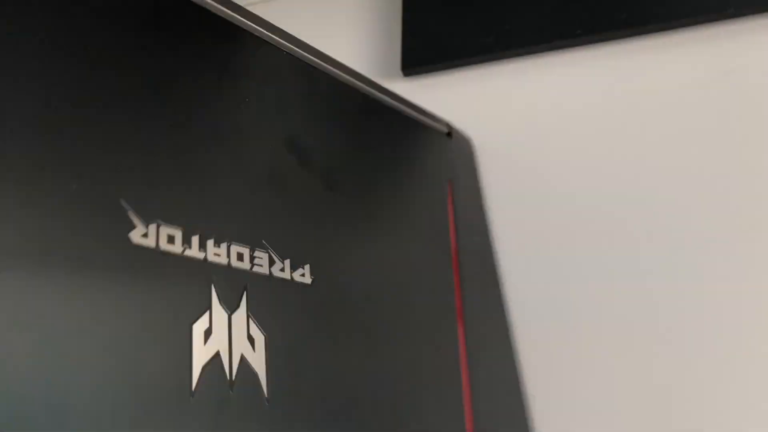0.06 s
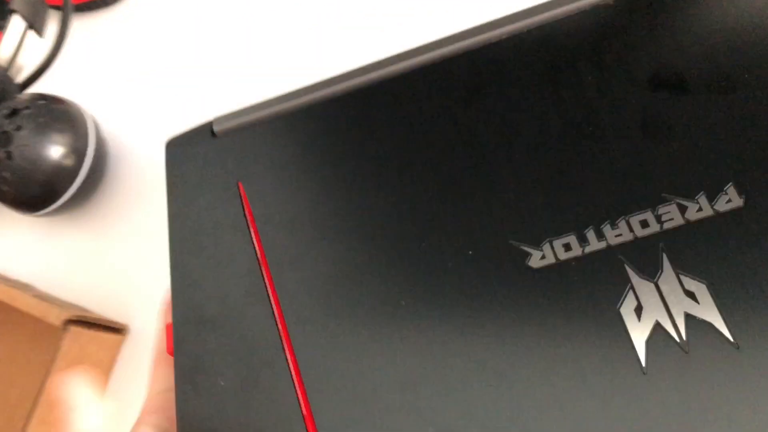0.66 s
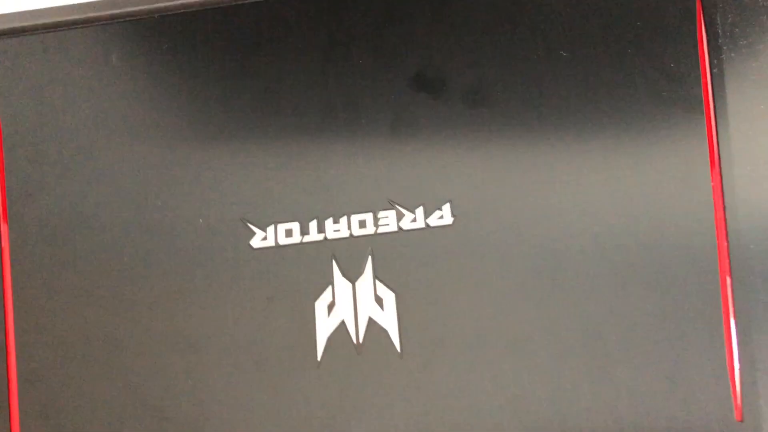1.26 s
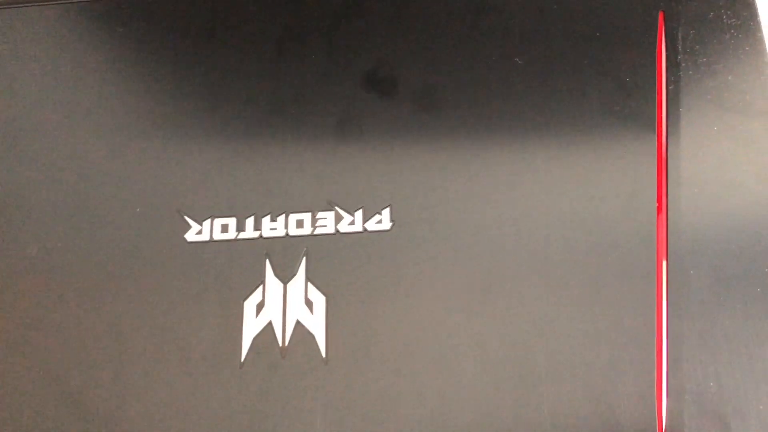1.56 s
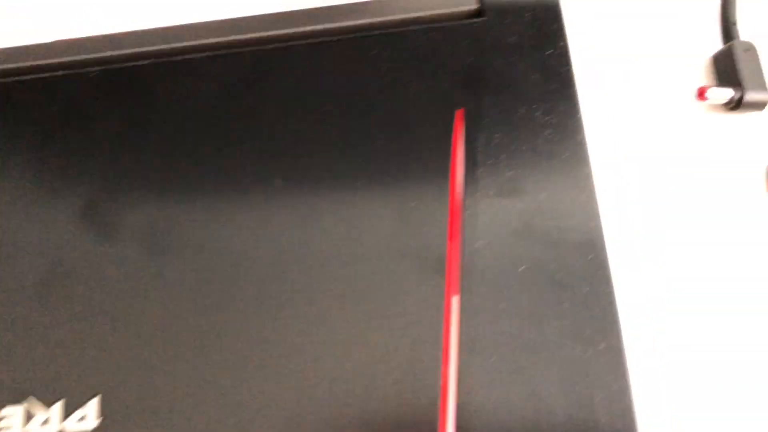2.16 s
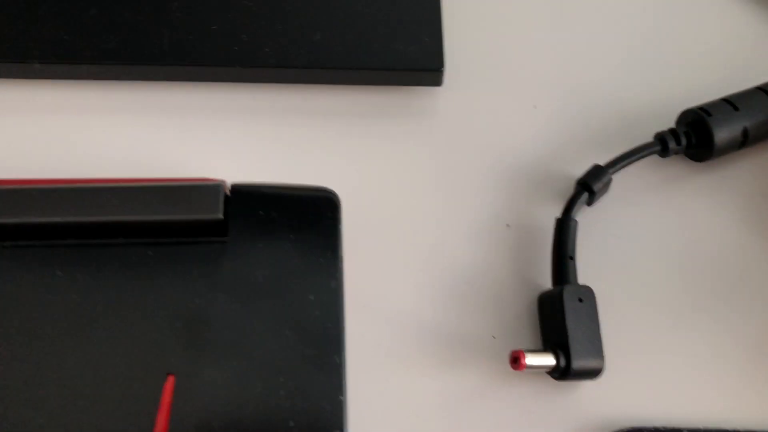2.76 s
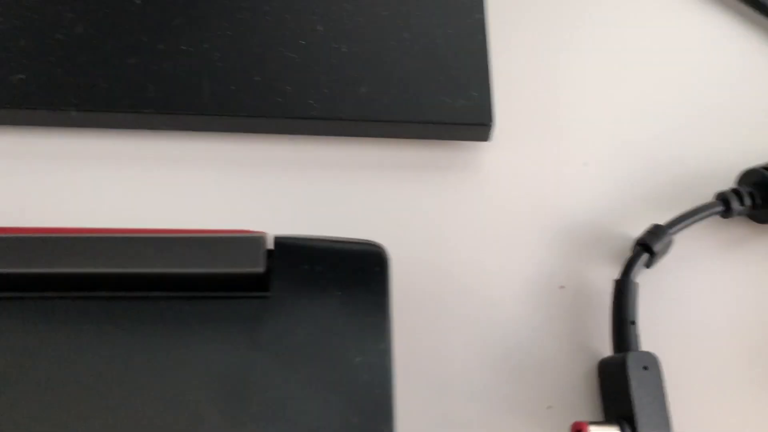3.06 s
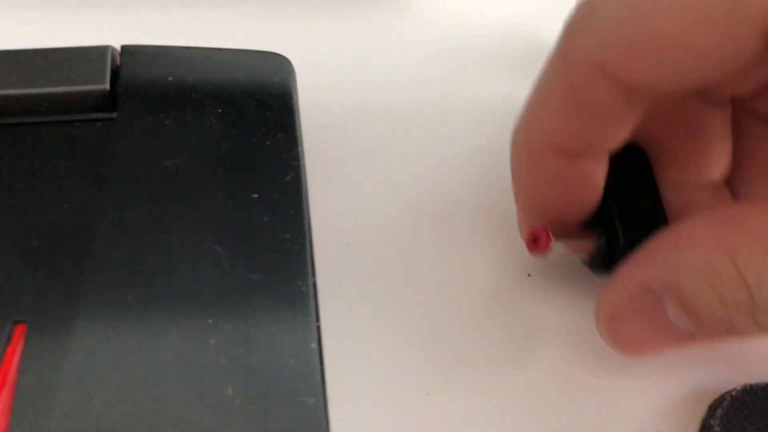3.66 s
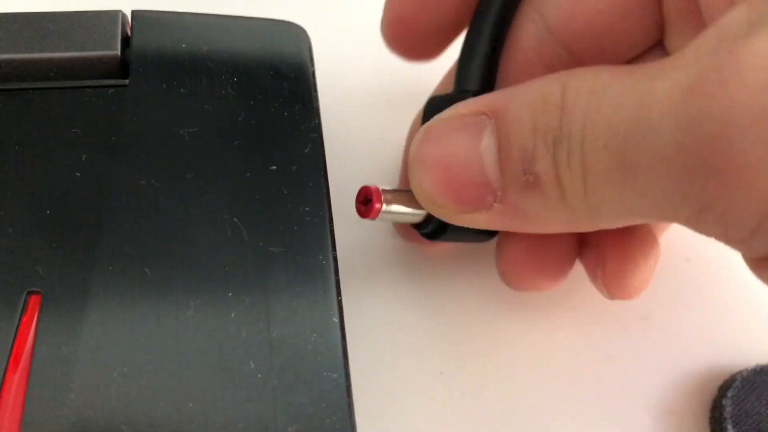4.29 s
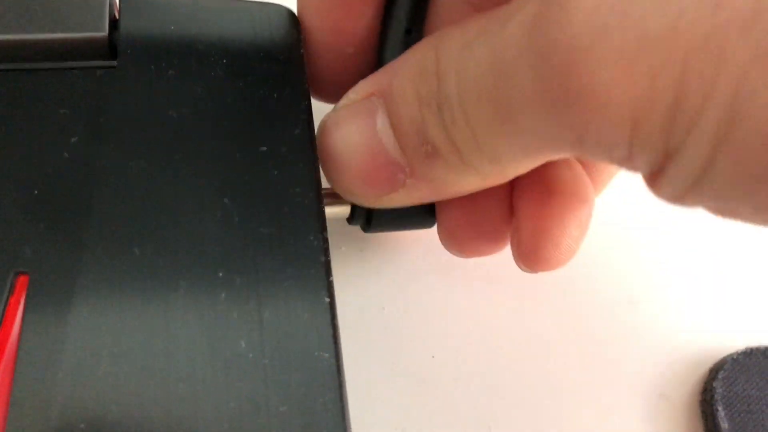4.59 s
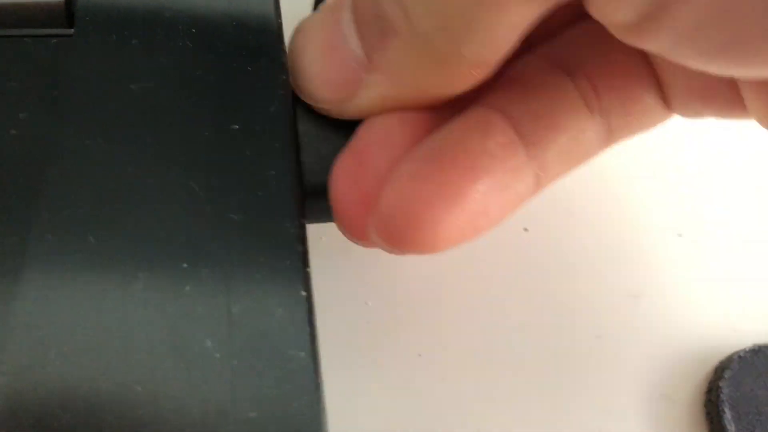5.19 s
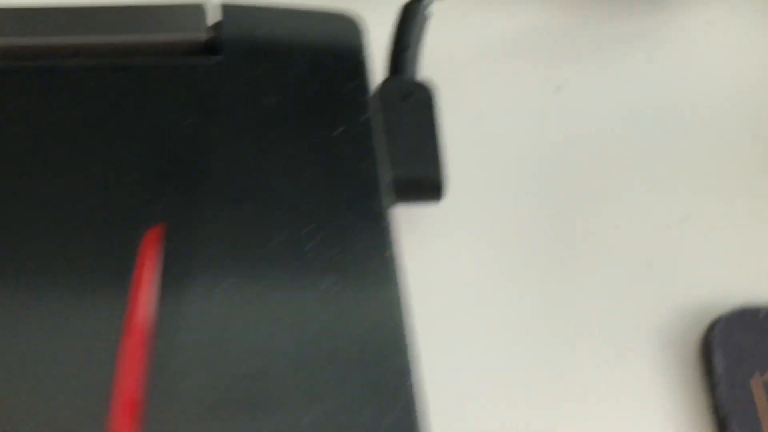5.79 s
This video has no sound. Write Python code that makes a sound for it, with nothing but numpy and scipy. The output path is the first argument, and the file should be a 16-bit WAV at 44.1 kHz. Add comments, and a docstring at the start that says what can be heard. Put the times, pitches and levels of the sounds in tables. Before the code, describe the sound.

A closed plastic laptop is slid round on a desk and set down with a quick run of hollow knocks, scrapes and tiny rubber squeaks. Fingers swish faintly over the lid, and one more knock follows. After a lull, a hand sweeps up a power plug, whose metal tip taps and scrapes along the case before snapping into the socket. It is all heard from close by in a small, quiet room.

```python
"""A closed plastic laptop is slid round on a desk and let down, knocking on its corners and rubber feet.
Each knock makes laptop and desk ring, and the rubber squeaks as it catches. Fingers swish over the lid,
and a thin hiss passes twice. From about 3.4 s a hand sweeps up the power plug. Its metal tip taps and
scrapes along the case and finds the socket, whose spring snaps round it at 5.2 s. A few faint touches
follow. All of it is heard from close by in a small, quiet room."""
import sys
import numpy as np
from scipy import signal
from scipy.fft import rfft, irfft, next_fast_len
from scipy.io import wavfile
from scipy.ndimage import uniform_filter1d

SR = 44100
rng = np.random.default_rng(int(sys.argv[2]) if len(sys.argv) > 2 else 0)


def output_pcm(signal):
    """Save a mono or channel-first signal as 16-bit PCM at the path in sys.argv[1].

    Samples are clipped to [-1, 1] before scaling.
    """
    pcm = np.clip(np.atleast_2d(signal).T, -1, 1) * 32767
    wavfile.write(sys.argv[1], SR, np.round(pcm).astype(np.int16))


N = 257544
TIME = np.arange(N) / SR

# The laptop hits the desk: (time [s], level [dB], extra thump [dB], treble fades above [Hz],
# distance through the desk [factor], ring time [factor], pitch the struck spot favours [Hz])
KNOCKS = [(0.003, -52.5, 9.3, 10200.0, 0.82, 0.93, 80.0), (0.2892, -30.5, -0.0, 6500.0, 1.03, 0.62, 136.5),
          (0.456, -40, -2.5, 5200.0, 0.99, 0.65, 952.0), (0.549, -31.5, 4.5, 5200.0, 1.43, 1.0, 797.0),
          (0.709, -37.5, -1.2, 10200.0, 0.75, 0.93, 328.0), (0.8366, -36.5, 1.5, 2900.0, 0.82, 0.9, 327.4),
          (0.8735, -33.5, -8.5, 5200.0, 1.2, 0.96, 152.3), (0.9197, -27.5, 4.5, 4600.0, 1.0, 1.0, 152.6),
          (1.0073, -18.5, -5, 5200.0, 0.56, 0.93, 500.0), (1.076, -33, -5.5, 2600.0, 1.2, 0.54, 950.0),
          (1.7447, -21.5, -7, 2300.0, 0.99, 0.73, 226.0)]
# Fingers and plug tap desk, case and socket: (time [s], level [dB], extra thump [dB],
# treble fades above [Hz], scrape length [factor], pitch the struck spot favours [Hz])
TAPS = [(2.0584, -59.5, -0.5, 11400.0, 0.82, 328.0), (2.5214, -48.5, -16.1, 599, 1.9, 440.0),
        (2.7162, -60, 2, 6500.0, 0.8, 440.0), (3.497, -49, 0.9, 4600.0, 0.97, 780.0),
        (3.5405, -54, 17.5, 10200.0, 2.3, 440.0), (4.1492, -40, -10.3, 598, 0.79, 950.0),
        (4.278, -28, -16, 600.0, 1, 1460.0), (4.32, -58.5, 10.5, 5200.0, 0.7, 1960.0),
        (4.3376, -50, -6, 3700.0, 1, 2750.0), (4.394, -48.3, -11, 1200.0, 2.3, 229.0),
        (4.4887, -57.5, -18.1, 16000.0, 0.8, 440.0), (4.4942, -64, -4.6, 16000.0, 0.86, 440.0),
        (4.5824, -48.7, 5, 6500.0, 1.4, 1130.0), (4.6809, -51.5, -5, 16000.0, 1.1, 229.0),
        (4.695, -46, -10.1, 2100.0, 1.6, 950.0), (4.705, -49.5, -9.5, 10200.0, 2.6, 2750.0),
        (4.7549, -56, -3, 5200.0, 0.8, 182.0), (4.8587, -37.5, -10, 700.0, 0.99, 1130.0),
        (4.888, -39, -11, 2590, 0.99, 436), (4.9316, -57.8, -7.8, 4600.0, 0.74, 440.0),
        (4.9823, -45.0, -16, 1700.0, 1.1, 440.0), (4.994, -63.5, 10.8, 8100.0, 0.8, 1130.0),
        (5.043, -42.1, -11.2, 1200.0, 0.9, 440.0), (5.1737, -34, -38.7, 4100.0, 1.2, 229.0),
        (5.181, -45, 3.3, 6500.0, 3.5, 437), (5.2077, -43.5, 2.6, 8100.0, 0.73, 2750.0),
        (5.214, -45.5, -6, 16000.0, 0.72, 182.0), (5.503, -59.5, -2, 2610, 2.0, 2750.0),
        (5.5874, -65.6, 11.5, 16020, 1.8, 2750.0), (5.6811, -64.5, -16, 9070, 2.1, 328.0)]
# The notes at which laptop and desk ring together: (pitch [Hz], level [dB], time to fade by 60 dB [s])
RING_NOTES = [(67, -11, 0.46), (131, -7, 0.19), (153, 0, .3), (182, -3, .2), (228, -4, .25),
              (278, -4, 0.11), (327.5, 0.5, .2), (436, -1, .07), (500, 3.5, 0.047), (779, 0, 0.073),
              (940, -2, .04), (1140, -2, 0.034), (1460, -1.5, 0.036), (1960, -2, .035), (2750, -1, .035)]
# Borders of the frequency bands in which a hit's level is set: (frequency [Hz])
KNOCK_BANDS = [40, 115, 260, 650, 1800, 4500, 9000, 16000]
TAP_BANDS = KNOCK_BANDS[1:]

# Rubbing strokes: (start [s], length [s], level [dB], pressure [dB])
SLIDES = [(-.03, .31, -46, 0.5), (.34, .2, -42, -7), (.57, .11, -42, 5), (.71, .11, -52, -7),
          (.87, .15, -44, 8)]  # laptop on the desk
SWISHES = [(1.335, 0.044, -58.5, 11.5), (1.38, 0.047, -55.5, 4), (1.45, 0.092, -60.5, 0),
           (1.545, 0.034, -54, -8), (1.59, 0.18, -54.5, 0.5), (2.06, 0.026, -60, 8),
           (2.125, .055, -67.5, -16)]  # fingers on the lid
BRUSHES = [(3.39, 0.11, -60, 0.5), (3.5, .17, -49, 1.5), (3.68, 0.2, -57, -1), (3.95, 0.061, -71, -7),
           (4.5, 0.14, -62, 9), (4.66, 0.17, -60.5, 8), (5.535, 0.039, -59.5, 1),
           (5.755, 0.057, -62.5, -6.5)]  # hand and plug on desk and case
# Rubber and skin catch and judder: (time [s], length [s], pitch [Hz], level [dB])
SQUEAKS = [(.586, 0.025, 830, -29), (.621, .024, 835, -32), (.657, .03, 900, -46), (3.815, 0.044, 900, -47)]
# The case's edge and the plug's barrel scratch: (time of peak [s], spread [s], level [dB])
SCRATCHES = [(.411, .006, -39), (3.637, .006, -45), (4.564, 0.0026, -44), (4.709, 0.0046, -48),
             (5.178, .0065, -41.5)]
# A thin hiss comes and goes: (time [s], level [dB])
THIN_HISSES = [(2.925, -61.5), (3.383, -55.5)]

# A sound's colour is how strong it is from bass to treble: (frequency [Hz], level [dB])
KNOCK_COLOUR = [(68, -7), (173, 1.3), (411, -1.36), (1080, -3), (2850, -5), (6360, -7.5), (12000, -7.5)]  # all knocks, per band
TAP_COLOUR = [(173, 1.6), (411, -4), (1080, -5), (2850, -6), (6360, -7.5), (12000, -7)]  # all taps, per band
SNAP_COLOUR = [(60, -26), (200, -13), (600, -5.5), (900, 0), (1280, 5), (1750, -1.5), (2100, -7),
               (2700, -5.5), (3800, -8), (5200, -14), (6400, -8.5), (9300, -8), (11500, -19.5),
               (15500, -19)]  # the socket's spring
SLIDE_COLOUR = [(300, -10), (680, -0.5), (850, -3), (1280, -1), (1500, -5), (1830, -3.5), (2400, -6.5),
                (4100, -7), (5500, -11.5), (9000, -22.5), (15000, -39.5)]  # surfaces under slides and swishes
BRUSH_COLOUR = [(300, -22), (700, -0.5), (1200, -1.5), (1550, -1.5), (1720, 6.5), (1950, -7), (3000, -9),
                (4500, -7), (8000, -20), (14000, -51)]  # surfaces under hand and plug
RUMBLE_COLOUR = [(30, -36), (70, -14), (115, -12), (152, -1), (190, -2), (230, -6.5), (275, -11), (335, -4),
                 (500, -21), (1000, -42.5)]  # the desk shaken by rubbing
RUB_HISS_COLOUR = [(2000, -36.5), (5000, -3.5), (7000, 0.5), (9300, 1), (10500, -4.5), (13000, -3),
                   (15500, -5)]  # the hiss of rubbing
SCRATCH_COLOUR = [(500, -20), (1500, -4), (2900, 0), (3600, -4), (4400, 0), (6300, -3), (9400, -8),
                  (15000, -14)]  # gritty scratches
ECHO_COLOUR = [(60, -7), (130, -6.5), (260, -4), (500, -12.5), (1200, -10), (2500, -8.5), (6000, -10),
               (14000, -12)]  # what the walls send back
THIN_HISS_COLOUR = [(1000, -10), (3200, -12), (3900, -5), (4700, 2), (5200, -18), (12000, -19)]  # the passing hiss
AIR_COLOUR = [(15, -36), (25, -9.5), (74, 0.5), (190, -6), (326, -7), (531, -21), (624, -17.5),
              (988, -23.5), (1260, -22), (2840, -28), (8590, -32), (14800, -40), (16000, -47.5)]  # the room's air
# How long the room's echo lasts: (frequency [Hz], time to fade by 60 dB [s])
ECHO_TIMES = [(70, .75), (150, .6), (300, .52), (1000, .58), (2500, .56), (5000, 0.47), (9000, 0.35),
              (15000, 0.24)]


def knocks():
    """The laptop lands on the desk and both ring. Gives two tracks: (to the microphone, into the room)."""
    out = np.zeros((2, N))
    for time, db, thump_db, soft_hz, distance, ring, spot_hz in KNOCKS:
        levels = band_levels(KNOCK_BANDS, KNOCK_COLOUR, db, thump_db, soft_hz, spot_hz)
        pair = hit(samples=16000, ring=ring, notes_db=-45, spot_hz=spot_hz, spot_db=8.5,
                   crack_s=0.029, crack_db=-13.5, shell_s=0.083, shell_db=-25)
        for track, sound in zip(out, pair):
            arrived = cross_desk(sound, travel_s=0.014 * distance)
            add(track, time, set_bands(arrived, KNOCK_BANDS, levels, below_db=-6))
    return out


def taps():
    """Fingers and plug touch lightly, some with a little scrape: (to the microphone, into the room)."""
    out = np.zeros((2, N))
    for time, db, thump_db, soft_hz, scrape, spot_hz in TAPS + skid():
        levels = band_levels(TAP_BANDS, TAP_COLOUR, db, thump_db, soft_hz, spot_hz)
        pair = hit(samples=4500, ring=0.63, notes_db=-46.5, spot_hz=spot_hz, spot_db=10.5,
                   crack_s=0.016 * scrape, crack_db=-13, shell_s=0.037, shell_db=-21.5)
        for track, sound in zip(out, pair):
            arrived = cross_desk(sound, travel_s=0.00602)
            add(track, time, set_bands(arrived, TAP_BANDS, levels, below_db=-9.5))
    return out


def skid(start_s=4.5232, gap_s=0.0125, first_db=-53.5, growth_db=2):
    """The plug's tip skids in five even slips that grow stronger. Gives rows like those of TAPS."""
    thump_db, scrape, spot_hz = -16, 1.7, 1960
    soft_hz = 4800 * 2 ** (0.35 * rng.uniform(-1.03, 1.03, 5))  # each is harder or softer by chance
    return [(start_s + k * gap_s, first_db + k * growth_db, thump_db, hz, scrape, spot_hz)
            for k, hz in enumerate(soft_hz)]


def snap(time_s=5.2195, burst_s=0.0018, ring_s=0.029, ring_db=-17):
    """The socket's spring lets go and rings for a moment: (to the microphone, into the room)."""
    t = np.arange(4500) / SR
    fade = np.exp(-t / burst_s) + amp(ring_db) * np.exp(-np.log(1000) * t / ring_s)
    grit = rng.standard_normal(len(t)) * fade
    push = signal.unit_impulse(len(t))
    near = 1.02 * push + 0.8 * grit / np.linalg.norm(grit)
    out = np.zeros((2, N))
    for track, sound in zip(out, [near, amp(-5) * push]):
        add(track, time_s, amp(10) * colour(cross_desk(sound, travel_s=0.00395), SNAP_COLOUR))
    return out


def hit(samples, ring, notes_db, spot_hz, spot_db, crack_s, crack_db, shell_s, shell_db):
    """A push starts the notes ringing: (with a crack and the shell's noisy ring, plain for the room)."""
    t = np.arange(samples) / SR
    fall = -np.log(1000) * t  # exp(fall / x) drops by 60 dB in x seconds
    fade = amp(crack_db) * np.exp(fall / crack_s) + amp(shell_db) * np.exp(fall / shell_s)
    noise = rng.standard_normal(samples) * fade
    bright_noise = signal.lfilter(*signal.butter(2, 480, "high", fs=SR), noise)
    plain = signal.unit_impulse(samples)
    for hz, db, fade_s in RING_NOTES:
        lift_db = spot_db * hump(hz, spot_hz, octaves=0.18)
        plain += amp(notes_db + db + lift_db) * np.cos(2 * np.pi * hz * t) * np.exp(fall / (fade_s * ring))
    return plain + bright_noise, plain


def band_levels(edges, base_colour, db, thump_db, soft_hz, spot_hz):
    """Weight adds thump to a hit, a soft touch loses treble, and the struck spot lifts its own pitch."""
    hz = band_centres(edges)
    weight_db = thump_db * hump(hz, 179, octaves=1.4)
    spot_db = 7 * hump(hz, spot_hz, octaves=0.8)
    treble_loss_db = 10 * np.log10(1 + (hz / soft_hz) ** 3.09)
    return db + read(base_colour, hz) + weight_db + spot_db - treble_loss_db


def set_bands(x, edges, levels, below_db, above_db=-4):
    """Steers a hit's first 35 ms toward the given band levels; it fades beyond the outer bands."""
    count, size = round(0.035 * SR), 4096
    hz = np.fft.rfftfreq(size, 1 / SR)
    power = 2 * abs(rfft(x[:count], size)) ** 2 / (size * count)
    band_power = np.histogram(hz, edges, weights=power)[0]
    gain_db = levels - 10 * np.log10(band_power + 1e-20)
    bottom, top = (edges[0] / 2, gain_db[0] + below_db), (edges[-1], gain_db[-1] + above_db)
    return colour(x, [bottom, *zip(band_centres(edges), gain_db), top])


def cross_desk(x, travel_s):
    """Bending waves cross the desk: the treble arrives first, the bass after nearly travel_s."""
    size = next_fast_len(len(x) + 2048)
    hz = np.fft.rfftfreq(size, 1 / SR)
    delay_s = travel_s * np.maximum(np.sqrt(100 / np.maximum(hz, 100)) - 0.12, 0)
    phase = 2 * np.pi * np.cumsum(delay_s) * hz[1]
    return irfft(rfft(x, size) * np.exp(-1j * phase), size)[:len(x)]


def rubbing(strokes, surface_colour, rumble_db, hiss_db, grain_db):
    """Rubbing shakes the desk, sounds the surface and hisses. Pressing gives more rumble, less hiss."""
    out = np.zeros(N)
    layers = [(RUMBLE_COLOUR, rumble_db, 1), (surface_colour, 0, 0), (RUB_HISS_COLOUR, hiss_db, -0.94)]
    for layer_colour, layer_db, pressure_effect in layers:
        level = sum(amp(db + layer_db + pressure_effect * pressure_db) * stroke(start, length)
                    for start, length, db, pressure_db in strokes)
        out += level * unit(colour(friction(grain_db, grains_per_s=350), layer_colour))
    return out


def stroke(start, length, rise_s=0.027, sag_db=-4, fade_s=0.034):
    """The loudness of one rub: it gets going, loses speed and dies away."""
    t = TIME - start
    rise = np.clip(t / rise_s, 0, 1)
    sag = amp(sag_db * np.clip(t / length, 0, 1))
    return rise * sag * np.exp(-np.maximum(t - length, 0) / fade_s)


def friction(grain_db, grains_per_s, patch_db=2.5):
    """Noise that jumps as rough spots catch and let go; its colour shifts as the contact moves."""
    roughness = np.interp(TIME * grains_per_s, np.arange(N), rng.standard_normal(N))
    grainy = rng.standard_normal(N) * amp(grain_db * roughness)
    spectra = signal.stft(grainy, nperseg=512)[2]
    patches = uniform_filter1d(rng.standard_normal(spectra.shape), size=3, axis=0)  # smooth over pitch
    patches = uniform_filter1d(patches, size=18, axis=1)  # and over time
    return signal.istft(spectra * amp(patch_db * unit(patches)))[1][:N]


def squeaks(overtone_db=-10, unevenness=0.2):
    """Rubber and skin stick and slip quickly, making short, wobbly tones."""
    out = np.zeros(N)
    for time, length, hz, db in SQUEAKS:
        wobble = unit(uniform_filter1d(rng.standard_normal(SR), size=30))[:round(length * SR)]
        phase = 2 * np.pi * np.cumsum(hz * (1 + unevenness * wobble)) / SR
        tone = sum(amp(overtone_db * k) * np.sin((k + 1) * phase) for k in range(4))
        add(out, time, amp(db) * unit(tone) * signal.windows.tukey(len(phase), 0.7))
    return out


def scratches():
    """The case's edge and the plug's metal barrel scrape in short, gritty swells."""
    level = sum(amp(db) * np.exp(-0.5 * ((TIME - time) / spread) ** 2) for time, spread, db in SCRATCHES)
    return level * unit(colour(friction(grain_db=4, grains_per_s=900), SCRATCH_COLOUR))


def room(x, first_echo_s=0.0035, build_up_s=0.011):
    """The walls answer with a blur of echoes whose treble dies first."""
    hz, frame_s, spectra = signal.stft(rng.standard_normal(SR), SR, nperseg=256)
    fade = np.exp(-np.log(1000) * frame_s / read(ECHO_TIMES, hz)[:, None])
    tail = signal.istft(spectra * fade, SR)[1][:SR]
    tail *= np.clip((TIME[:SR] - first_echo_s) / build_up_s, 0, 1)
    tail = colour(tail / np.linalg.norm(tail), ECHO_COLOUR)
    return amp(-3.5) * signal.fftconvolve(x, tail)[:N]


def background(air_db=-61.5, rise_s=0.014, fade_db_per_s=115):
    """Steady room air, and a thin hiss that twice starts quickly and fades."""
    air, hiss = rng.standard_normal((2, N))
    hiss_level = np.zeros(N)
    for time, db in THIN_HISSES:
        age = np.maximum(TIME - time, 0)
        hiss_level += np.minimum(age / rise_s, 1) * amp(db - fade_db_per_s * age)
    return amp(air_db) * unit(colour(air, AIR_COLOUR)) + hiss_level * unit(colour(hiss, THIN_HISS_COLOUR))


def colour(x, points):
    """Gives x a colour. The filter never sounds ahead of its input, so hits stay sharp."""
    size = 4096
    log_gain = np.log(amp(read(points, abs(np.fft.fftfreq(size, 1 / SR)))))
    response = np.exp(np.conj(signal.hilbert(log_gain)))
    return signal.oaconvolve(x, irfft(response[:size // 2 + 1])[:size // 2])[:len(x)]


def read(points, hz):
    """Reads between a table's rows, with frequency spaced by octaves."""
    row_hz, values = np.transpose(points)
    return np.interp(np.log(hz + 1), np.log(row_hz + 1), values)


def hump(hz, centre_hz, octaves):
    """A bell curve that is 1 at the centre pitch."""
    return np.exp(-(np.log2(hz / centre_hz) / octaves) ** 2)


def band_centres(edges):
    """The middle pitch of each band."""
    return np.sqrt(np.multiply(edges[:-1], edges[1:]))


def amp(db):
    """Turns decibels into a multiplier."""
    return 10 ** (np.asarray(db) / 20)


def unit(x):
    """Scales x to an average power of 1."""
    return x / np.sqrt(np.mean(x ** 2) + 1e-20)


def add(mix, time, sound):
    """Mixes a sound in at a time in seconds."""
    part = mix[max(round(time * SR), 0):][:len(sound)]
    part += sound[:len(part)]


def scene():
    """Laptop, hand and plug in the room, as one channel."""
    near, into_room = knocks() + taps() + snap()
    rubs = squeaks() + scratches()
    rubs += rubbing(SLIDES, SLIDE_COLOUR, rumble_db=0, hiss_db=-14, grain_db=2)
    rubs += rubbing(SWISHES, SLIDE_COLOUR, rumble_db=-0.5, hiss_db=-7, grain_db=2)
    rubs += rubbing(BRUSHES, BRUSH_COLOUR, rumble_db=0.5, hiss_db=-2.5, grain_db=2.5)
    return (near + rubs + room(into_room + rubs) + background())[None]


def record(dry):
    """The microphone drops the deepest bass; then the highest treble is cut."""
    x = signal.sosfilt(signal.butter(2, 35, "high", fs=SR, output="sos"), dry)
    treble_cut = signal.firwin(401, 16100, window=("kaiser", 9), fs=SR)
    return signal.oaconvolve(x, treble_cut[None], "same")


dry = scene()
out = record(dry)
output_pcm(out)
```